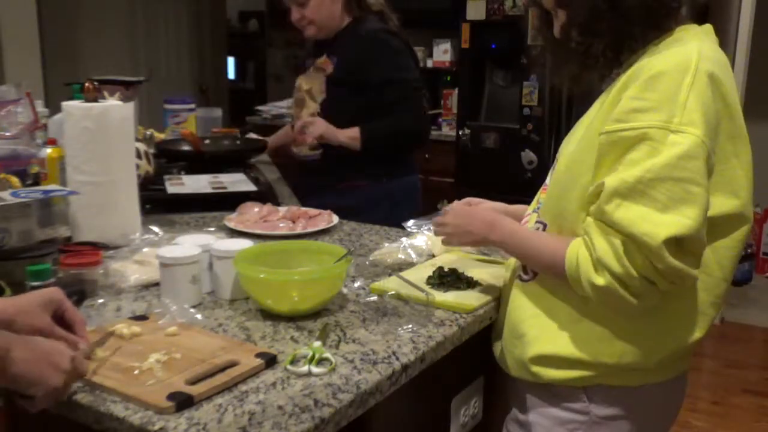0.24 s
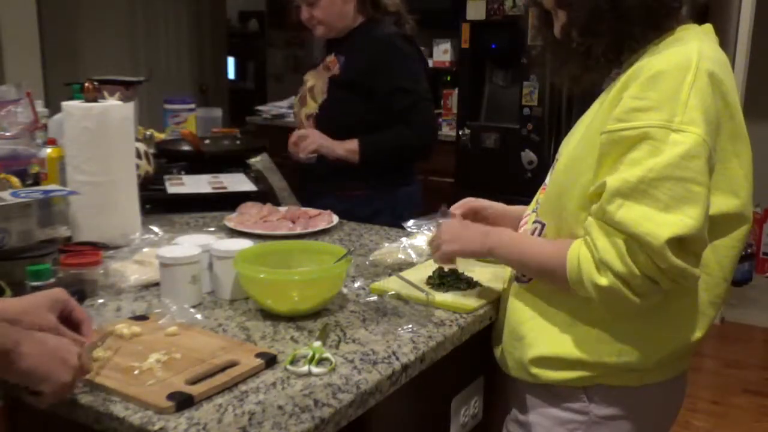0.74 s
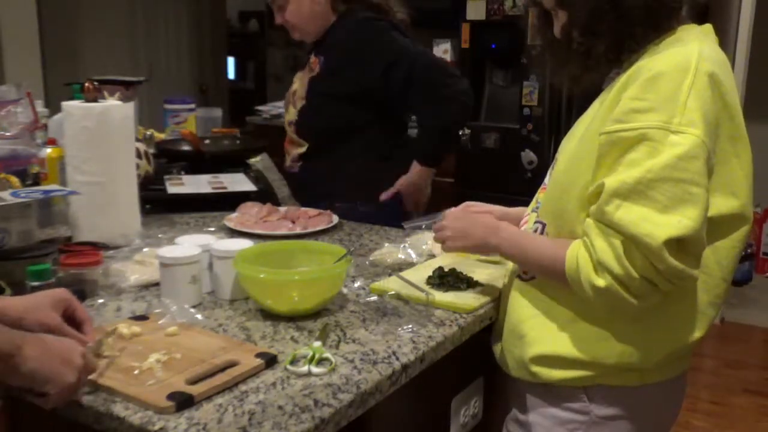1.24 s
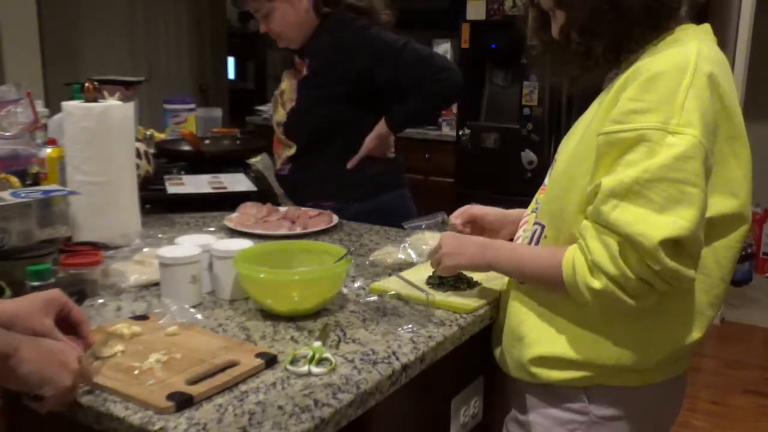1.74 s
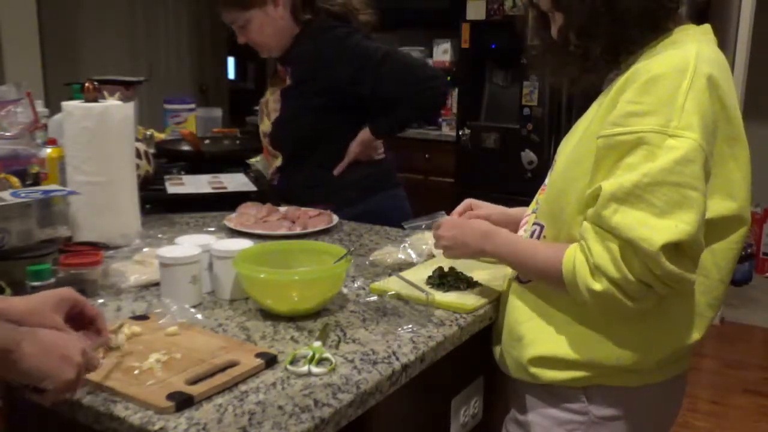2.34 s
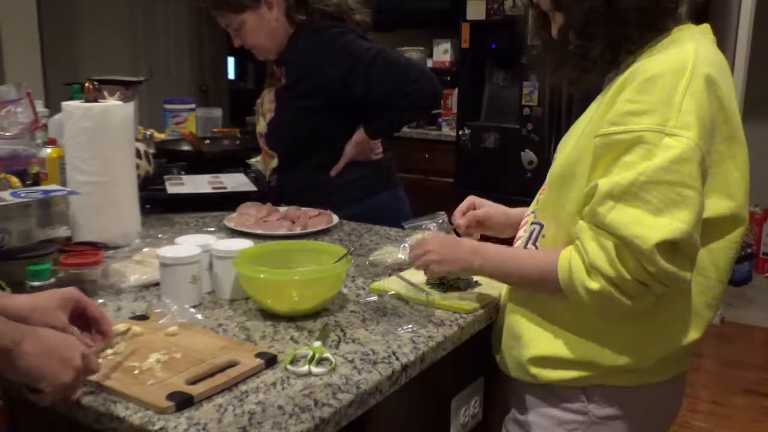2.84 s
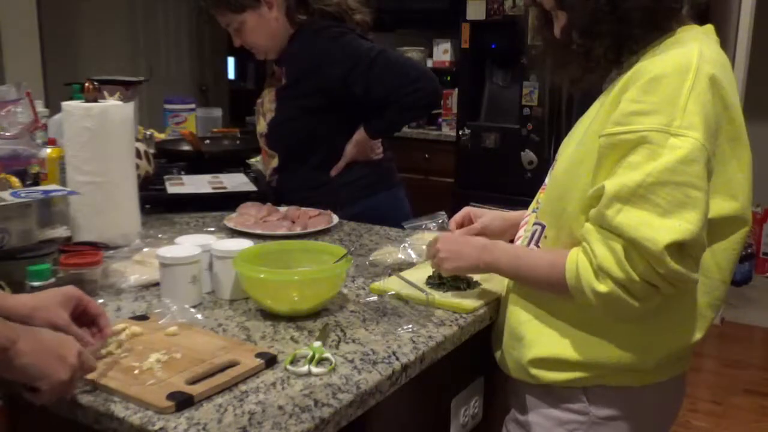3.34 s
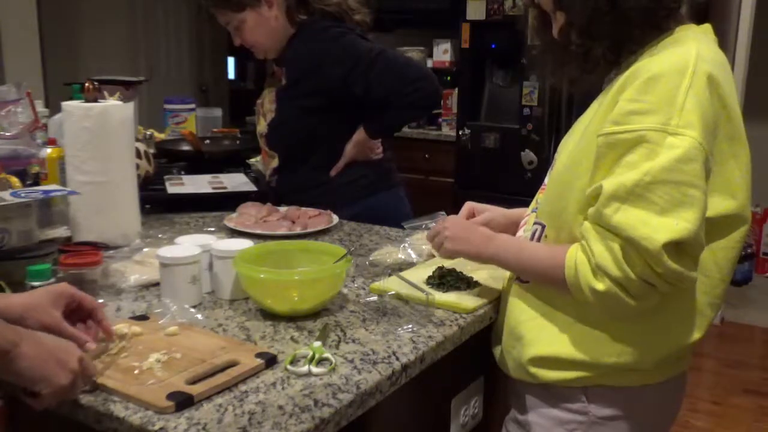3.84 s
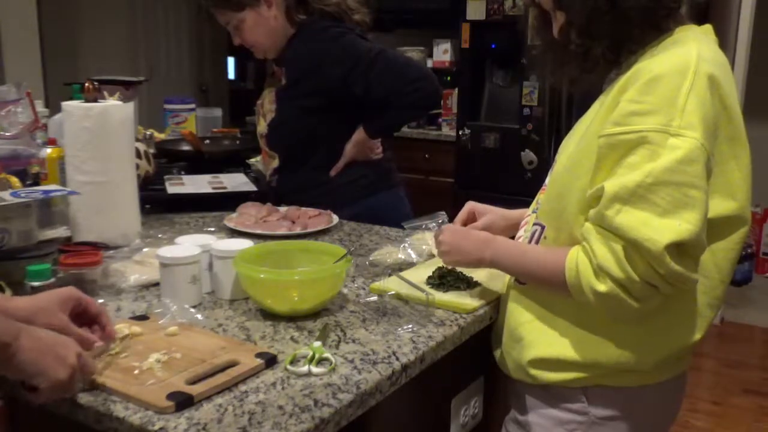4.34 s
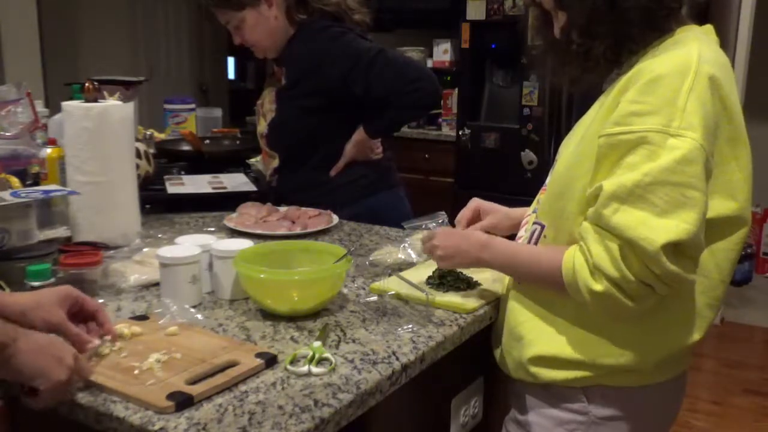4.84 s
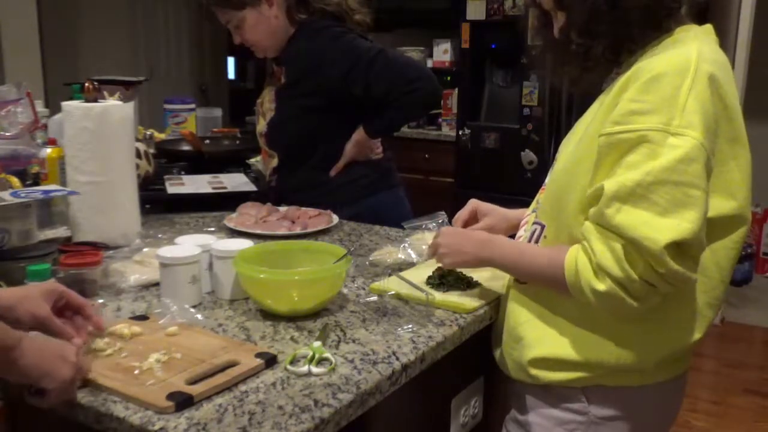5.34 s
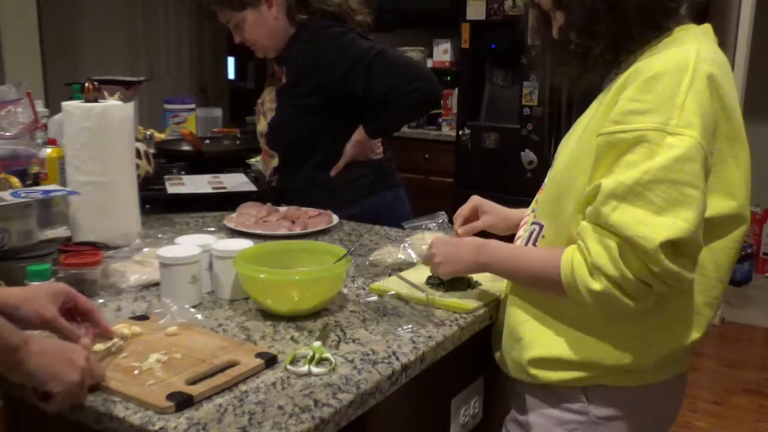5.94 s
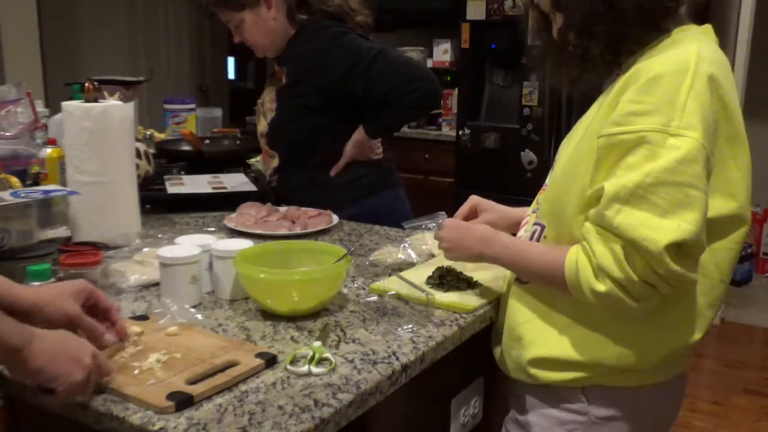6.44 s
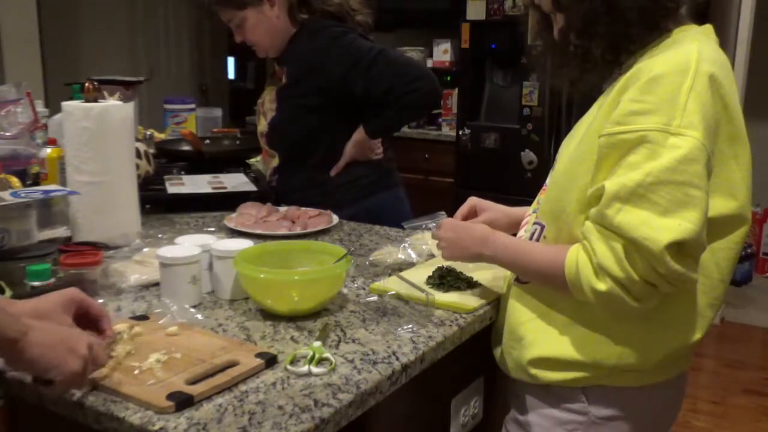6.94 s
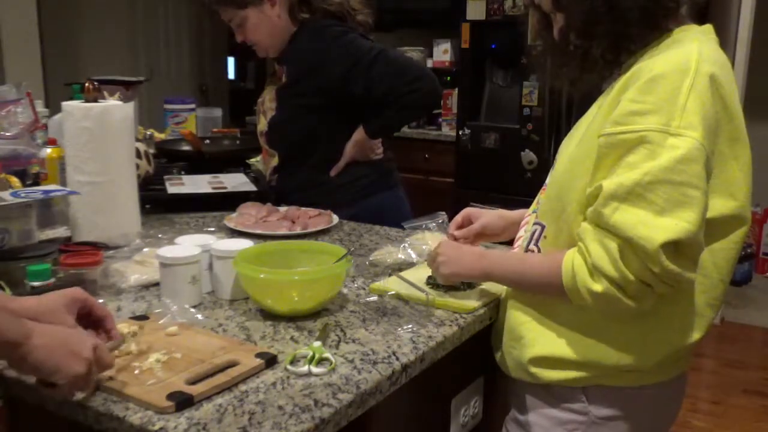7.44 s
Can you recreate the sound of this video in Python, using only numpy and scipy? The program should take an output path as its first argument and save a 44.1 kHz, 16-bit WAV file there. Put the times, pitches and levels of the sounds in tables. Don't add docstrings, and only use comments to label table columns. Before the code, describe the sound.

A knife chops garlic on a wooden board about twice a second in a lively kitchen, with faint metallic jingling, leaf rustling and utensil tinks.

```python
import sys
import numpy as np
from scipy import signal
from scipy.fft import rfft, irfft, next_fast_len
from scipy.io import wavfile
from scipy.ndimage import uniform_filter1d, minimum_filter1d

SR = 44100
rng = np.random.default_rng(int(sys.argv[2]) if len(sys.argv) > 2 else 0)


def dump(signal):
    limited = np.clip(np.atleast_2d(signal).T, -1, 1)
    pcm = np.round(limited * 32767).astype(np.int16)
    wavfile.write(sys.argv[1], SR, pcm)


def voltage_ratio(decibels):
    exponent = np.asarray(decibels, float) / 20
    return 10 ** exponent


N = 340011

# (time [s], peak [dB], landing spot [0 edge - 1 centre], weight at 850 Hz [dB],
# brightness at 5700 Hz [dB]), both colours against 2500 Hz
CHOPS = [(0.3022, -6, 0.33, -26, -11.5), (0.8959, -8.5, 0.36, -24.5, -12.5), (1.354, -15.5, 0.49, -21, -27),
         (1.5468, -17.5, 0.86, -12, -29), (2.0603, -32, 0.25, -7, -18), (2.5163, -4.5, 1, -10, 1.5),
         (3.021, -38.5, 0.83, -3, 6), (3.4568, -16.5, 0.53, -18, -11), (3.9436, -25, 0.6, -3, -9.5),
         (4.437, -17.5, 0.59, -10.5, -31), (4.8798, -9.5, 1, -16, -10), (5.391, -5.5, 0.26, -29, -13.5),
         (5.8145, -8, 0.85, -17, -13.5), (6.5241, -42, 0.3, 5, -5), (7.093, -7, 0.81, -10, -16),
         (7.5368, -10.5, 0.79, -16.5, 0.5)]
# (gap [ms], strength [0-1], edge colour at 3800 Hz [dB])
ROCK = [(1.406, 0.22, -8.5), (1.444, 0.32, -10.5), (1.32, 0.44, -17), (2.0, 0.28, -20), (2.06, 0, -21),
        (1.66, 0.16, -2), (4, 0.5, -5), (1.497, 0.7, -12), (0.496, 0.25, -11.5), (1.16, 0.3, -10.5),
        (1.69, 0.12, -16), (1.46, 0.17, -12.5), (2.24, 0.33, -11.5), (1.67, 0.4, -1), (1.147, 0.24, -3.5),
        (1.61, 0.2, -5.5)]
# (frequency [Hz], width [Hz], level struck at the edge [dB], level struck at the centre [dB])
BOARD = [(442, 98, 12, -4), (596, 56, 17.5, 2.5), (713, 94, 11.5, 4.5), (834, 59, 21, 11.5),
         (915, 44, 11.5, 12.5), (1169, 77, 6.5, 12), (1464, 51, 9.5, -4.5), (1390, 45, 4.5, -1.5),
         (1648, 64, 4.5, 2.5), (1745, 58, -2, 9.5), (2065, 140, -1.5, 2), (2060, 73, 3.5, 0),
         (2093, 140, -1.5, 2), (2320, 100, -14, 2), (2400, 38, -9, 4.5), (2510, 160, -9, -1),
         (2745, 118, -12.5, 10), (2850, 120, 12, -20), (2890, 90, -4, 4), (3100, 73, 7, 1),
         (3270, 166, -21, 9), (3400, 130, -8.5, 9.5), (3630, 50, -4, -13), (3836, 154, -2, 7),
         (4070, 210, -6.5, 2), (4330, 93, -4.5, -3), (4630, 180, -7, -1.5), (4980, 350, -6.5, 1),
         (5930, 100, -31, -3), (6340, 260, -4, -7)]
# (blow time [s], frequency [Hz], lift [dB])
ACCENTS = [(.302, 2002, -2), (.302, 2740, 4.5), (.302, 4660, -1), (.896, 1184, 1), (.896, 2240, -3),
           (.896, 2583, 4), (.896, 4530, 4), (1.354, 1590, 5.5), (1.354, 2230, -3), (1.354, 3000, -3),
           (1.547, 1270, 1), (1.547, 1630, 3.5), (1.547, 1830, 5), (1.547, 2100, -4), (1.547, 2411, 0),
           (1.547, 3100, 7.5), (1.547, 3400, -10), (2.06, 650, 9), (2.06, 1400, 4), (2.516, 1174, 0.5),
           (2.516, 1710, 3.5), (2.516, 2476, -5), (2.516, 2660, 5), (2.516, 3079, 2.5), (2.516, 4371, -4),
           (2.516, 5540, 6), (2.516, 6080, 5), (3.457, 1080, 2), (3.457, 1636, 5), (3.457, 2713, 3),
           (3.457, 3300, 3), (3.457, 3746, -2), (3.457, 4198, 7), (3.457, 4700, 2), (3.457, 5297, -2),
           (3.944, 1410, 6), (3.944, 2130, 0), (3.944, 3273, 0), (4.437, 1399, 4), (4.437, 2050, 2),
           (4.437, 3290, 0), (4.88, 1430, 4.5), (4.88, 3100, 6), (4.88, 4091, 2), (4.88, 4500, 5),
           (5.391, 882, 4.5), (5.391, 1765, -7), (5.391, 5270, 3), (5.815, 2562, 0), (5.815, 3316, 3),
           (5.815, 4155, 0), (5.815, 5170, 2), (7.093, 1170, -4), (7.093, 2745, 2.5), (7.093, 3500, 0),
           (7.093, 4340, -4), (7.536, 2490, 6), (7.536, 3100, -10), (7.536, 3531, -2), (7.536, 4070, 7)]
# (frequency [Hz], level [dB])
STANDING = [(914, -55.5), (1174, -59), (1420, -58), (1685, -63), (1743, -61), (2011, -61), (2114, -62),
            (2299, -61), (2697, -61), (2745, -62.5), (2807, -61), (2865, -61), (3105, -64), (3377, -65)]
# (start [s], length [s], level [dB])
CUTS = [(0.286, 0.016, -37), (0.879, 0.044, -39.5), (1.341, 0.036, -40.5), (2.043, 0.031, -44),
        (2.753, 0.048, -44.5), (3.007, 0.064, -43.5), (3.903, 0.11, -54), (4.399, 0.013, -45),
        (4.424, 0.02, -44), (5.348, 0.094, -51), (6.506, 0.11, -51.5), (7.053, 0.077, -42.5),
        (7.525, 0.039, -45)]
# (time [s], peak [dB], top end [dB])
TICKS = [(0.538, -36.5, -23), (0.673, -35, -11.5), (1.4933, -29, -16), (1.504, -42, -16), (1.724, -30, -21),
         (2.0592, -28, -19), (2.2074, -41, -11), (2.761, -26, -10), (2.887, -35, -8), (2.904, -34, -8),
         (3.013, -36, -10), (5.376, -40, -12), (3.8422, -37, -6), (4.8094, -47, -6), (4.715, -39, -8),
         (5.673, -28.5, -18), (5.9694, -45, -7), (6.2194, -59, -11), (6.2803, -39, -15), (6.7994, -42, 0)]
# (frequency [Hz], width [Hz])
TRINKET_MODES = [(8100, 24.5), (7265, 9.9)]
# (time [s], hold [s], level [dB], lower tone against the upper [dB])
SHAKES = [(0.0, 0.011, -49.5, -16), (.19, 0.027, -63, -11), (0.674, 0.038, -42, -16),
          (0.983, 0.073, -48.5, -6), (1.08, 0.033, -46.5, -12), (1.303, 0.092, -50, -12),
          (1.56, 0.023, -43, -18), (1.68, 0.087, -47.5, -3), (1.838, .14, -47, -9), (2.055, 0.039, -47, -9),
          (2.206, 0.14, -50.5, -8), (2.54, 0.11, -50.5, -13), (2.748, 0.034, -48, -5),
          (2.873, 0.079, -43.5, -13), (3.015, 0.15, -54.5, -16), (3.41, 0.14, -52.5, -9),
          (3.948, 0.038, -46.5, -11), (4.3, .1, -69, -12), (4.474, 0.076, -51.5, -12),
          (4.675, 0.3, -55, -13), (4.983, 0.06, -43.5, -13), (5.345, 0.022, -46, -10),
          (5.473, 0.14, -47, -11), (5.676, 0.24, -46.5, -9), (5.967, 0.15, -48, -21),
          (6.227, 0.085, -49, -18), (6.561, 0.12, -48.5, -17), (6.8, 0.065, -44.5, -14),
          (7.01, 0.36, -47.5, -12), (7.56, .15, -45, -12)]
# (upper tone [dB], lower tone [dB])
REST_DB = [-67.5, -78]
# (time [s], frequency [Hz], level [dB], t60 [s])
TINKS = [(.575, 5900, -55, 0.15), (.575, 2260, -51, 0.27), (.585, 1410, -51, .2), (.65, 3100, -56, 0.2),
         (.68, 3400, -56, 0.37), (1.75, 5100, -50.5, 0.54), (1.82, 3310, -57, 0.44),
         (2.235, 5140, -57, 0.46), (3.04, 5130, -54, 0.22), (4.711, 3060, -52, .4), (4.75, 5175, -61, .3),
         (5.589, 5900, -56, .1), (5.64, 5175, -45, 0.12), (5.725, 5150, -45.5, 0.14),
         (6.511, 1735, -47, 0.29), (6.518, 3880, -54, 0.19), (6.6, 5175, -55.5, 0.69),
         (4.73, 3400, -55.5, 0.46), (4.705, 5700, -54, 0.14), (6.67, 3060, -59, .5), (1.75, 3000, -52, .4),
         (2.24, 5900, -60, .3), (6.83, 3400, -61, .5), (.673, 8100, -39, 0.13), (.68, 7265, -54, .6),
         (7.27, 7265, -54, .7), (3.63, 7265, -58, .7), (2.872, 8100, -36, 0.067), (2.886, 7900, -34, 0.035),
         (2.904, 8100, -30.5, 0.06), (2.935, 8160, -38, 0.11), (3.012, 8100, -36, 0.16),
         (5.971, 8100, -29.5, 0.19), (5.975, 7265, -42.5, 0.51), (1.67, 7265, -56, 0.5),
         (3.025, 915, -46, 0.36), (3.025, 1745, -44, 0.17), (3.06, 5150, -57, .6)]
# (time [s], frequency [Hz], level [dB], t60 [s])
LINGERS = [(2.066, 770, -42, 0.2), (2.062, 2200, -42, .06), (2.075, 900, -39, .2), (3.035, 900, -49, 0.26),
           (2.825, 1700, -56, 0.4), (7.05, 1745, -48, 0.23), (5.4, 2050, -47, 0.13), (5.4, 1150, -50, .1),
           (6.53, 980, -50, .3), (6.52, 2800, -56.5, 0.76), (1.356, 2080, -31, 0.16), (2.519, 1180, -32, 0.48),
           (2.53, 1730, -31, .6), (3.945, 1650, -34, 0.24), (3.95, 860, -38, 0.22), (5.9, 1760, -44, 0.23),
           (4, 905, -28.5, 0.37), (7.098, 920, -27.5, 0.58), (7.542, 1230, -35, 0.58), (5.82, 990, -43, 0.25)]
# (time [s], leaf rustle level [dB])
BUSY = [(0.0, -59), (0.4, -68.5), (0.73, -52.5), (0.94, -67), (1.1, -54), (1.4, -55.5), (1.85, -50.5),
        (2.3, -59), (2.79, -52.5), (3.65, -65.5), (4.08, -62.5), (4.4, -68), (4.95, -50), (5.2, -70),
        (5.58, -48.5), (6.31, -58.5), (7.3, -53), (7.71, -53)]
# (frequency [Hz], density [dB per Hz])
SHUFFLE_COLOUR = [(250, -4.5), (500, -1.5), (900, -4.5), (1500, -11), (2500, -20.5)]
# (frequency [Hz], density [dB per Hz])
LEAF_COLOUR = [(1000, -14), (2000, 1), (3300, 3.5), (6000, -0.5), (8500, 7), (11000, -20)]
# (frequency [Hz], density [dB per Hz])
HUSH_COLOUR = [(15, -48), (25, -18), (57, -11), (75, -10.5), (174, -7.5), (269, -2.5), (298, -7.5),
               (375, -6.5), (849, -8.5), (1690, -13.5), (7640, -22), (8240, -19.5), (11200, -36),
               (14600, -92), (22000, -120)]
# (frequency [Hz], width [Hz], level [dB])
HUM_TONES = [(50.4, 5.1, -69), (119, 4.3, -71.5), (179, 18.3, -60.5), (241.9, 28, -59.5),
             (299.6, 11.5, -59.5), (540, 7.4, -74), (665.3, 24, -64.5), (842, 9.7, -63.5),
             (969, 3.4, -65.5)]
# (frequency [Hz], left-right likeness [0-1])
ALIKE = [(60, 0.99), (170, 0.96), (490, 0.92), (1380, 0.67), (3930, 0.71), (11200, 0.71)]
# (frequency [Hz], t60 [s])
KITCHEN = [(500, 0.38), (1000, 0.45), (2800, 0.42), (5500, 0.35), (10000, 0.094)]


def unit(x):
    return x / np.sqrt(np.mean(x ** 2) + 1e-20)


def along(points, hz):
    f, v = np.transpose(points)
    return np.interp(np.log(hz + 1), np.log(f + 1), v)


def filtered(x, response):
    n = x.shape[-1]
    m = next_fast_len(n + 8192)
    return irfft(rfft(x, m) * response(np.fft.rfftfreq(m, 1 / SR)), m)[..., :n]


def resonance(f, centre_hz, width_hz):
    return 1j * f * width_hz / (centre_hz ** 2 - f * f + 1j * f * width_hz)


def causal(gain):
    c = irfft(np.log(gain + 1e-6))
    half = len(c) // 2
    c = np.r_[c[0], 2 * c[1:half], c[half], np.zeros(half - 1)]
    return irfft(np.exp(rfft(c)))


def spread(pair):
    def mid_side_gains(hz):
        angle = np.arccos(np.clip(along(ALIKE, hz), -1, 1)) / 2
        return np.array([np.cos(angle), np.sin(angle)])

    mid, side = filtered(pair, mid_side_gains)
    return np.array([mid + side, mid - side])


def rush(spectrum, patchy_db):
    z = signal.stft(rng.standard_normal((2, N)), nperseg=512)[2]
    field = rng.standard_normal(z.shape[1:])
    field = uniform_filter1d(uniform_filter1d(field, 6, 0), 10, 1)
    pair = signal.istft(z * voltage_ratio(patchy_db * unit(field)), nperseg=512)[1][:, :N]
    return unit(spread(filtered(pair, lambda hz: voltage_ratio(along(spectrum, hz)))))


def add(out, s, sound):
    part = out[:, round(s * SR):][:, :sound.shape[1]]
    part += sound[:, :part.shape[1]]


def diffuse():
    hz, t, z = signal.stft(rng.standard_normal((2, SR // 2)), SR, nperseg=256)
    decay = voltage_ratio(-60 * t / along(KITCHEN, hz)[:, None])
    tail = spread(signal.istft(z * decay, SR, nperseg=256)[1])
    t = np.arange(tail.shape[1]) / SR
    counter = 3.2 * np.exp(-t / .0045)
    cupboards = .9 * np.exp(-((t - .0085) / .002) ** 2)
    middle = tail.mean(0)
    tail = middle + (tail - middle) * (1 - .5 * np.exp(-t / 0.016))
    bright = filtered(tail, lambda hz: 1 - 0.5 / (1 + (hz / 1150) ** 4))
    tail = (tail + bright * (counter + cupboards)) * (1 - np.exp(-t / .0006))
    return tail / np.linalg.norm(tail[0])


def standing():
    t, t60 = np.arange(SR // 2) / SR, .38
    return sum(voltage_ratio(db - 60 * t / t60) * np.sin(2 * np.pi * hz * t) for hz, db in STANDING)


def room(tail, wet_db):
    answer = voltage_ratio(wet_db) * tail
    answer[:, 0] = 1
    return answer


def evened(answer):
    power = np.abs(rfft(answer.mean(0), 32768)) ** 2
    smooth = uniform_filter1d(uniform_filter1d(power, size=70), size=70)
    bumps = np.sqrt(uniform_filter1d(power, size=1500) / smooth)
    return causal(bumps[::8])


def hush():
    return voltage_ratio(-52) * rush(HUSH_COLOUR, patchy_db=.4)


def hum():
    out = np.zeros(N)
    for centre_hz, width_hz, db in HUM_TONES:
        tone = filtered(rng.standard_normal(N), lambda hz: resonance(hz, centre_hz, width_hz) ** 2)
        out += voltage_ratio(db) * unit(tone)
    return out


def handling():
    s, db = np.transpose(BUSY)
    leaves_db = np.interp(np.arange(N) / SR, s, db)
    shuffle_db = -52 + 0.4 * (leaves_db - leaves_db.mean())
    shuffle = rush(SHUFFLE_COLOUR, patchy_db=1.5)
    leaves = rush(LEAF_COLOUR, patchy_db=1.8)
    return voltage_ratio(shuffle_db) * shuffle + voltage_ratio(leaves_db) * leaves


def shaking(tone):
    t, attack_s = np.arange(N) / SR, 0.018
    settle_db_per_s = (186, 143)[tone]
    each = []
    for s, hold, db, lower_db in SHAKES:
        fall_db = settle_db_per_s * np.maximum(0, t - s - hold)
        rise = np.clip((t - s) / attack_s + 1, 0, 1)
        each.append(voltage_ratio(db + tone * lower_db - fall_db) * rise)
    return np.max(each, 0) + voltage_ratio(REST_DB[tone])


def trinket():
    out = np.zeros((2, N))
    for tone, (centre_hz, width_hz) in enumerate(TRINKET_MODES):
        chance, sign, size = rng.random((3, N))
        hit = chance < 250 / SR
        contacts = hit * np.sign(sign - .5) * voltage_ratio(-3 * np.log(size + 0.0012))
        rattle = contacts + 0.09 * rng.standard_normal((2, N))
        ring = filtered(rattle, lambda hz: resonance(hz, centre_hz, width_hz) * resonance(hz, centre_hz, 700))
        steady = np.sqrt(np.abs(uniform_filter1d(np.mean(ring ** 2, 0), SR // 16)))
        out += shaking(tone) * ring / steady
    return out


def crackle():
    dry = np.zeros((1, N))
    fibre_colour = [(800, 4.5), (3000, 0.5), (9000, 4.5), (11000, -3.5)]  # (Hz, dB)
    for s, length, db in CUTS:
        n = round(length * SR)
        uneven_db = 4 * np.repeat(rng.standard_normal(n // 40 + 1), 40)[:n]
        snaps = rng.standard_normal(n) * voltage_ratio(uneven_db)
        burst = filtered(snaps, lambda hz: voltage_ratio(along(fibre_colour, hz)))
        swell = np.sin(np.pi * (np.arange(n) / n) ** 0.57) ** .5
        add(dry, s, voltage_ratio(db) * (unit(burst) * swell)[None])
    for s, db, top_db in TICKS:
        colour = [(1500, -28), (4000, -6.0), (7000, -2.5), (10000, top_db + 10.5), (12000, top_db - 1)]
        snap = causal(voltage_ratio(along(colour, np.fft.rfftfreq(512, 1 / SR))))
        add(dry, s, voltage_ratio(db + 4.5) * (snap / np.abs(snap).max())[None])
    return signal.fftconvolve(dry, room(diffuse(), wet_db=0.5), axes=1)[:, :N]


def board_knock(chop, rock):
    s, db, spot, low_db, top_db = chop
    gap_ms, strength, upper_db = rock
    f = np.fft.rfftfreq(4096, 1 / SR)
    modes = voltage_ratio(-25.0)
    for centre_hz, width_hz, edge_db, centre_db in BOARD:
        mode_db = edge_db + spot * (centre_db - edge_db)
        modes = modes + voltage_ratio(mode_db) ** 2 * np.abs(resonance(f, centre_hz, width_hz)) ** 2.06
    body_db = 3 + 0.53 * low_db
    tilt = [(100, low_db - 73), (280, low_db - 22.0), (450, low_db - 3.5), (850, low_db), (1450, body_db),
            (2500, 0.0084), (3800, upper_db), (5700, top_db), (7500, top_db - 4.5), (9000, top_db - 6.5),
            (11000, top_db - 32)]
    woken_db = np.zeros(len(f))
    for at, hz, lift_db in ACCENTS:
        if abs(at - s) < 1 / 20:
            woken_db += lift_db * np.abs(resonance(f, hz, 110)) ** 2
    contacts = np.abs(1 + np.clip(strength, 0, .95) * np.exp(-2j * np.pi * f * gap_ms / 1000))
    knock = causal(np.sqrt(modes) * voltage_ratio(along(tilt, f) + woken_db) * contacts)
    return voltage_ratio(db + 12) * knock / np.linalg.norm(knock)


def knife():
    out = np.zeros((2, N))
    same = diffuse()
    same[:, :SR // 2] += standing()
    n = np.arange(220)
    crack = voltage_ratio(-60 * n / SR / 0.0086) * np.cos(np.pi * 3 / 8 * n)
    f = np.fft.rfftfreq(4096, 1 / SR)
    snap = causal(np.abs(resonance(f, 4740, 900)) ** 1.24)[:200]
    snap = snap / np.abs(snap).max()
    for chop, rock in zip(CHOPS, ROCK):
        s, db, _, _, top_db = chop
        rough_crack = crack * rng.standard_normal((1, len(crack))) * [[1], [1]]
        add(out, s - .0003, voltage_ratio(0.73 * db - 18.5) * rough_crack)
        add(out, s - .0006, voltage_ratio(db + 0.6 * top_db - 1) * np.outer([1, 1], snap))
        tail = 1.14 * same + 0.93 * diffuse()
        answer = room(tail, wet_db=9.5)
        knock = signal.fftconvolve(board_knock(chop, rock), evened(answer))
        add(out, s - .0005, signal.fftconvolve(knock[None], answer, axes=1))
    lean_db = 0.3
    return out * voltage_ratio([[lean_db], [-lean_db]])


def utensils():
    out, t = np.zeros((2, N)), np.arange(SR * 2 // 5) / SR
    wander = 0.054
    for s, tone_hz, db, t60 in TINKS + LINGERS:
        detune, phase = rng.normal(0, 0.0047, (2, 1)), rng.uniform(-0.63, 0.46, (2, 1))
        blur = wander * np.cumsum(rng.standard_normal((2, len(t))), axis=1)
        first = np.sin(2 * np.pi * tone_hz * t + blur[0])
        second = np.sin(2 * np.pi * tone_hz * (1 + detune[0]) * t + phase + blur[1])
        flutter_db = 2.6 * np.interp(t * 90, np.arange(50), rng.standard_normal(50))
        pair = (first + 0.82 * second) * voltage_ratio(flutter_db)
        add(out, s, voltage_ratio(db - 60 * t / t60) * (1 - np.exp(-t / 0.0022)) * pair)
    return out


def scene():
    return hush() + hum() + handling() + trinket() + crackle() + knife() + utensils()


def limited(x, top_db, release_s):
    over = np.maximum(0, np.log(np.abs(x).max(0) + 1e-9) - np.log(voltage_ratio(top_db)))
    ramp = np.arange(N) / SR / release_s
    duck = np.maximum.accumulate(np.log(over + 1e-9) + ramp) - ramp
    ahead = -minimum_filter1d(-np.exp(duck), size=90)
    return x * np.exp(-uniform_filter1d(ahead, size=90))


def top_cut(x):
    return signal.sosfilt(signal.butter(12, 11770, fs=SR, output="sos"), x)


def record(dry):
    change = limited(dry, top_db=-5, release_s=0.009) - dry
    ducked = filtered(change, lambda hz: 1 - 1 / (1 + (hz / 400) ** 6))
    mix = filtered(dry + ducked, lambda hz: 1 / (1 + (hz / 10950) ** 90))
    return top_cut(mix)


dry = scene()
out = record(dry)
dump(out)
```